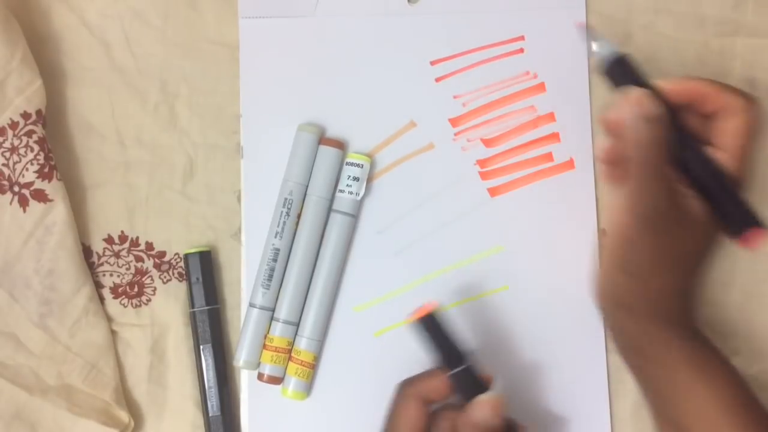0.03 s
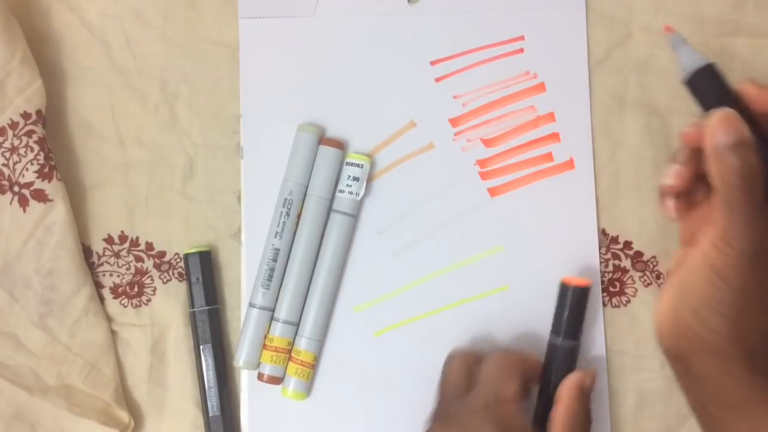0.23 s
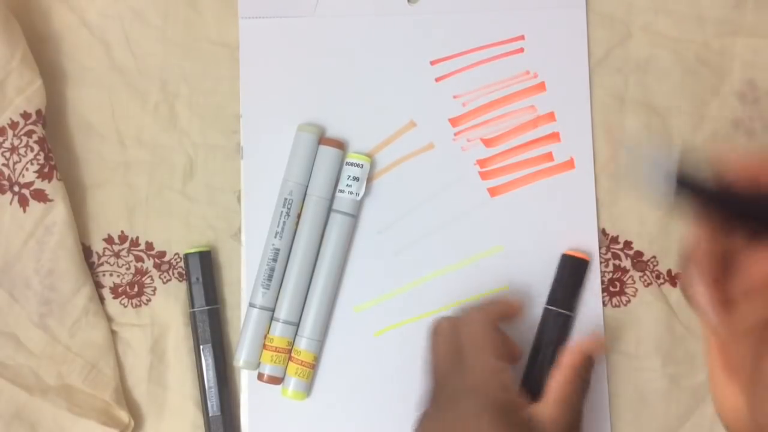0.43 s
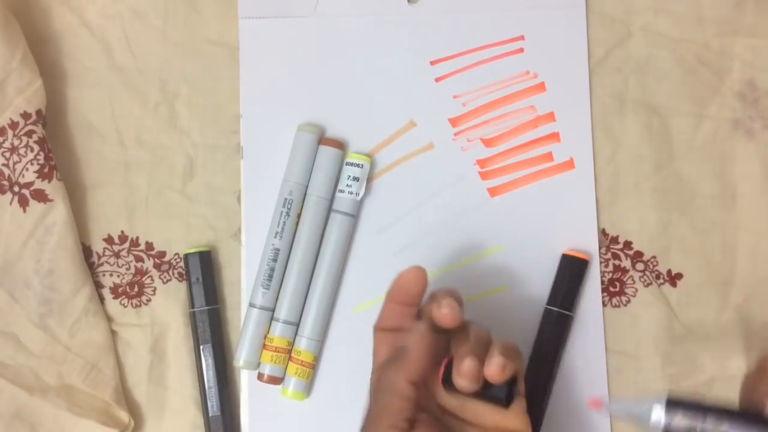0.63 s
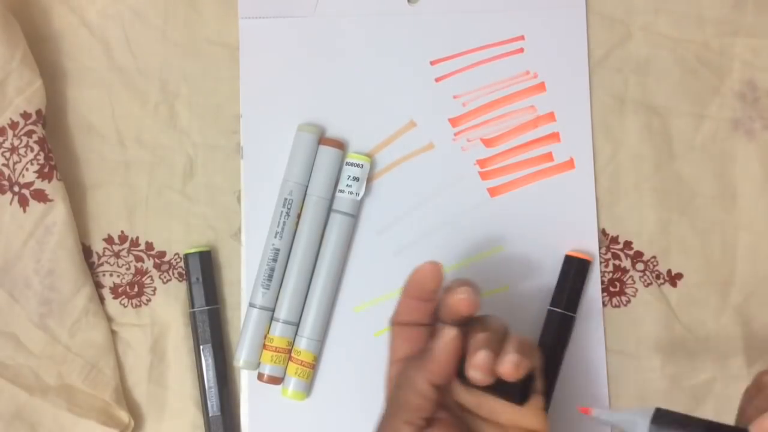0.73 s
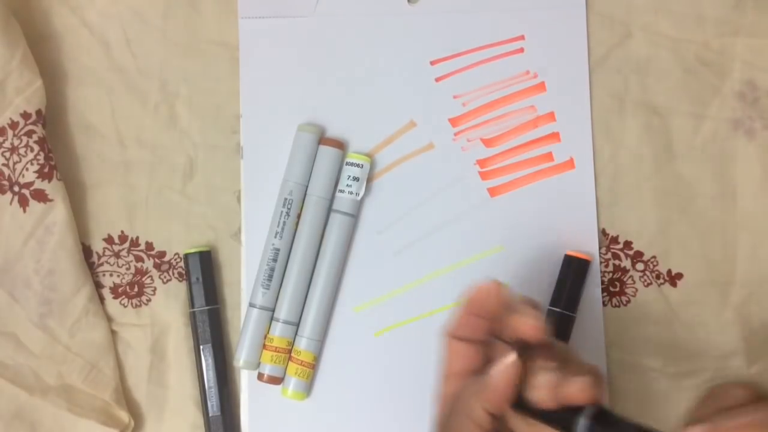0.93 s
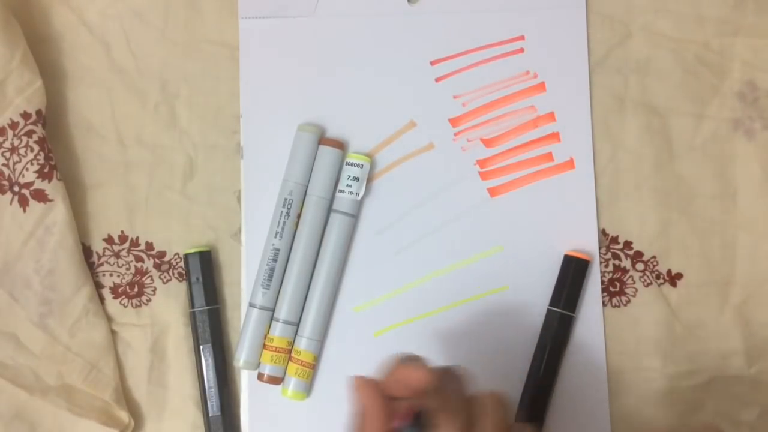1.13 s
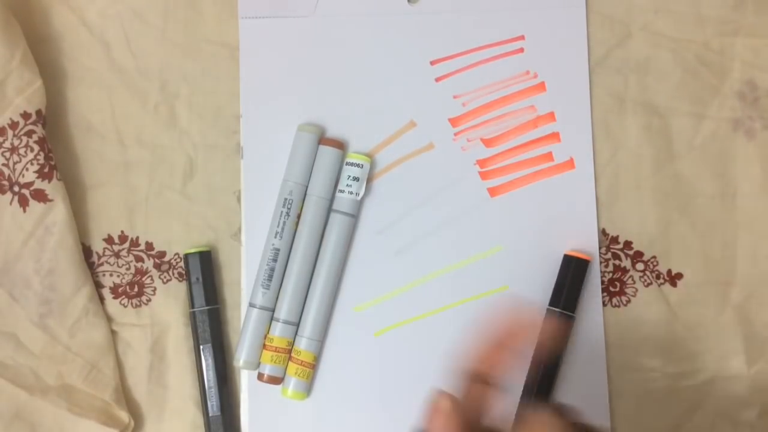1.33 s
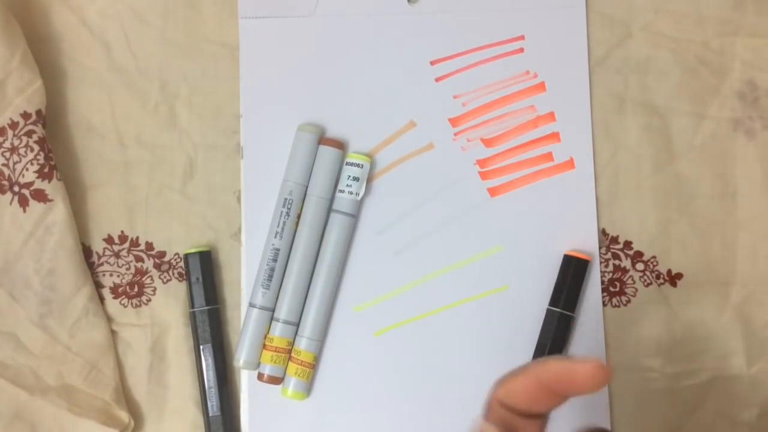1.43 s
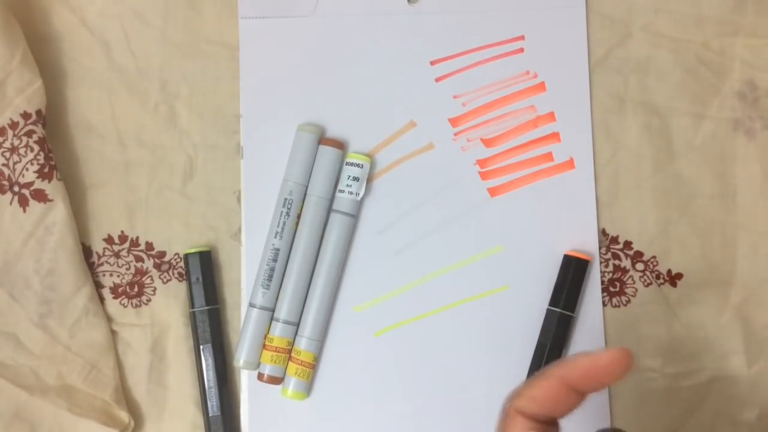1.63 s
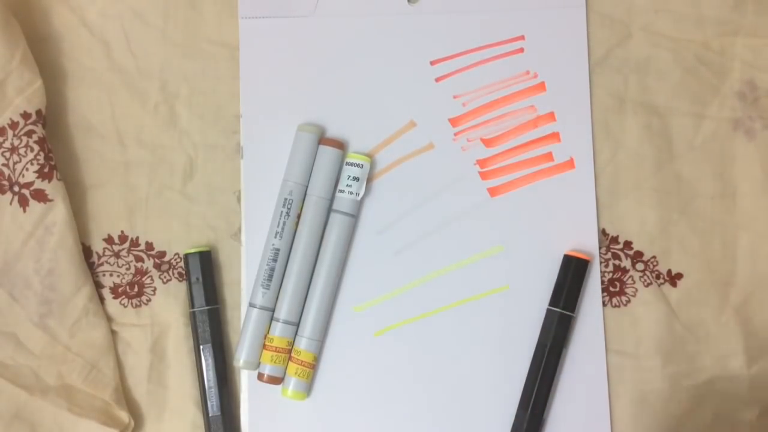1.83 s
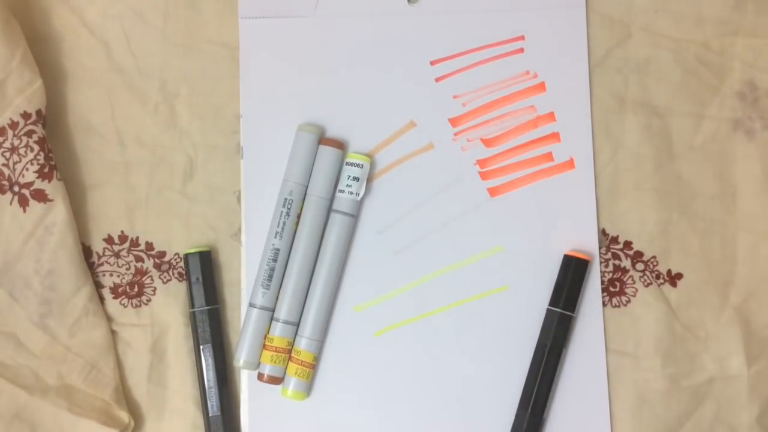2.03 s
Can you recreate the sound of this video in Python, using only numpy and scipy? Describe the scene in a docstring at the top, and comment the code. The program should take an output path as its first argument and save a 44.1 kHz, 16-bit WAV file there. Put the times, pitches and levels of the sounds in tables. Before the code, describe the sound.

Marker pens are capped, close to a phone in a small, dry, quiet room. After faint ticks, a pen lands on a papered table at 0.28 s with a dull woody knock and a softer one at 0.36. At 1.0 a cap scrapes over ridges and snaps sharply. At 1.55 another squeaks and cracks shut, clipping with a low air thump. Light ticks and soft rubbing follow until 2.1, over faint hum.

```python
"""Marker caps close beside a phone in a small, dry room: one scrapes over its ridges and snaps home, another
is pushed shut hard with a squeak, a puff of air and a crack that overloads the microphone.
Caps are coloured impulses plus damped modes; scrape and squeak are filtered noise; the puff is a pressure swing.
Earlier, a marker lands on a paper-covered table with two dull knocks: filtered thuds plus table modes.
Ticks (short cracks) and slides (grainy noise) of fingers and barrels run over room noise and a faint hum."""
import sys
import numpy as np
from scipy import signal
from scipy.fft import rfft, irfft
from scipy.io import wavfile
from scipy.ndimage import uniform_filter1d

SR = 44100
rng = np.random.default_rng(int(sys.argv[2]) if len(sys.argv) > 2 else 0)


def wav_out(sig):
    """Save sig, one row per channel (or a flat mono array), as 16-bit PCM at SR to the path in sys.argv[1]."""
    wavfile.write(sys.argv[1], SR, np.round(np.clip(np.atleast_2d(sig).T, -1, 1) * 32767).astype(np.int16))


N = 92433  # samples

# Colour and mode levels are relative within their table.
# Cap riding over its ridges and seating: start_s, click_db, ring_db
SNAP_CLICKS = [(.9925, -31, -48), (1.0000, -29, -38.5), (1.0137, -16, -18.5), (1.0221, 1.5, -38.5),
               (1.0335, 0, 1)]
# Colour of its clicks: freq_hz, level_db
SNAP_COLOUR = [(60, -41.5), (300, -26), (900, -20), (2200, -11.5), (4300, -11), (6000, -6), (7400, -0.5),
               (10300, -2.5), (11700, -19.5), (15500, -16.5)]
# Modes of its cap and barrel: freq_hz, level_db, t60_s
SNAP_MODES = [(1665, -30.5, .012), (2340, 8.5, 0.016), (2330, -3, 0.0089), (2910, 0.5, .012),
              (3200, 4.5, 0.013), (3750, 5, .011), (5520, 9, 0.0071), (8300, -13.5, .018),
              (9180, 5, 0.0141), (10500, 4, .011)]
# Smoother colour of its room return: freq_hz, level_db
SNAP_ROOM_COLOUR = [(410, -45), (700, -11), (1060, -22), (1390, -11.5), (2360, -6), (4400, -10.5),
                    (5350, -8), (6090, -13.5), (9330, -6), (11300, -19), (15500, -29)]
# Cap pushed shut hard: start_s, click_db, ring_db
SLAM_CLICKS = [(1.5475, 12.5, 2)]
# Colour of its click: freq_hz, level_db
SLAM_CLICK_COLOUR = [(150, -18.5), (500, -19), (1000, -21), (1600, -11), (2100, -6.5), (2700, 0), (3500, 3),
                     (4500, -9), (7800, -3.5), (10000, -16), (12000, -9.5), (15500, -18.5)]
# Modes of its cap and barrel: freq_hz, level_db, t60_s
SLAM_CAP_MODES = [(2690, 2, 0.013), (3434, -4.5, 0.027), (3600, -2, 0.0055), (4086, -10, 0.03),
                  (5400, -3, .014), (6650, -11, .014), (8130, -2.5, 0.029), (8620, -23, .02)]
# Smoother colour of its room return: freq_hz, level_db
SLAM_ROOM_COLOUR = [(470, -46.5), (800, -17), (1040, -21.5), (1150, -9), (1350, -12.5), (1760, -15),
                    (2710, -2), (4880, -7), (7970, -8.5), (14000, -21.5)]
# Cap scraping between its ridges: time_s, level_db
SCRAPE_LEVELS = [(1.006, -50), (1.012, -42), (1.020, -35.5), (1.025, -30), (1.033, -30.5)]
# Squeak of the tight cap: freq_hz, width_octaves, level_db
SQUEAK_TONES = [(3449, 0.076, -34), (4200, 0.027, -45.5), (7760, 0.02, -29.5)]
# Marker laid on the table: start_s, level_db, hardness_cutoff_hz
TABLE_KNOCKS = [(0.275, -9.5, 8500), (0.3557, -19.5, 1220)]
# Table modes: freq_hz, level_db, t60_s
TABLE_MODES = [(91, -14.5, .13), (165.4, -5.5, 0.11), (277, -22, 0.09), (405, -11.5, 0.097),
               (447, -5, 0.036), (482.3, -14, 0.17), (640, -43, 0.025), (727, 0, 0.043),
               (883, -14.5, 0.043), (978, -19, 0.08), (1454, -8.5, 0.058), (1530, -20, 0.081),
               (2200, -40, 0.02)]
# Colour of the contact thud: freq_hz, level_db
THUD_COLOUR = [(40, 6), (130, 6), (400, 10), (850, -0.5), (1200, -6.5), (2400, -16), (4500, -45),
               (15000, -54)]
# Knocks thrown back by near walls: delay_s, level_db
WALL_ECHOES = [(.0072, -7.5), (0.0122, -2.5)]
# Light touches of plastic: start_s, level_db, centre_hz, width_octaves
PLASTIC_TICKS = [(.024, -42, 4000, 6), (.058, -93, 9000, 1), (.078, -38.5, 11000, 4),
                 (0.2749, -25.5, 6250, 0.3), (0.2768, -28.5, 2530, 1.7), (0.3659, -30, 2200, 0.7),
                 (.434, -34.5, 4500, 2), (1.141, -34, 2380, 1.8), (1.151, -51, 5000, 1.9),
                 (1.4914, -29, 8130, 1.65), (1.5243, -31, 3400, 1.2), (1.5358, -42, 11000, 2),
                 (1.6976, -36, 2770, 0.72), (1.7013, -38.5, 6500, 0.63), (1.889, -45, 7000, 0.75),
                 (1.9021, -29, 5500, 0.93), (2.043, -41, 6500, 1.2)]
# Colour of a finger's soft nudge: freq_hz, level_db
NUDGE_COLOUR = [(100, -34), (200, -14), (290, 0.5), (420, -2.5), (560, -8), (900, -29.5)]
# Skin and plastic sliding: start_s, length_s, level_db, centre_hz, width_octaves
SLIDES = [(.01, 0.11, -57.5, 8950, 7.5), (0.112, 0.17, -64, 1670, 2.2), (0.368, .125, -58.5, 2600, 2.4),
          (0.463, 0.026, -50, 1800, 1.14), (0.491, .2, -66, 1370, 2.8), (1.134, .03, -51.5, 4850, 2),
          (1.162, 0.088, -50, 11500, .8), (1.173, 0.095, -60.5, 3080, 3.1), (1.25, 0.24, -62.5, 6000, 1.6),
          (1.687, .075, -51, 6000, 1.7), (1.759, .075, -55.5, 8000, 1.5), (1.887, 0.031, -56, 4914, 2),
          (1.925, .075, -55.5, 8500, 1.6), (2.0, .08, -64, 6500, 1.6)]
# Colour of the room noise: freq_hz, level_db
FLOOR_COLOUR = [(15, -50), (25, -23.5), (59, -9.5), (91, -10), (122, -0.5), (147, -15.5), (178, -11),
                (239, -13.5), (469, -17), (581, -19.5), (1140, -30), (1660, -25.5), (2550, -32),
                (8560, -30.5), (15500, -38.5)]

SNAP_T60_S, SNAP_ROOM_DB = 0.0045, -11.5
SLAM_T60_S, SLAM_ROOM_DB = 0.0037, -11.5
CAP_GRIT_GAIN = 0.2
SCRAPE_HZ, SCRAPE_OCTAVES, SCRAPE_GRAIN_DB = 7700, 0.6, 4
SQUEAK_S = 0.018
PUFF_S, PUFF_DB, PUFF_LOW_HZ = 1.5478, -4, 42.3
PUFF_RISE_S, PUFF_FALL_S, PUFF_TURN_S = 0.0019, 0.0088, 0.0005
THUD_DB, TABLE_DB, KNOCK_ROOM_DB, KNOCK_LOW_HZ = -2.5, -3.5, -8, 57
TICK_T60_S, TICK_ROOM_DB = 0.004, -10
NUDGE_S, NUDGE_DB = 1.9027, -29
RUB_ATTACK_SHARE, RUB_RELEASE_SHARE = 0.17, 0.29  # of each slide's length
RUB_GRAIN_DB, RUB_ROOM_DB = 1.5, -6
FLOOR_DB = -59
HUM_HZ, HUM_DB, HUM_WAVER_DB = 119.5, -67.5, 1.8
ROOM_T60_S, ROOM_DELAY_S, ROOM_BUILD_S, ROOM_LOW_HZ = 0.16, 0.001, 0.003, 486
WALL_S, WALL_SPREAD_S, WALL_GAIN = 0.021, 0.006, 0.3
TOP_HZ = 15800


def undb(db):
    """Decibels to gain."""
    return 10 ** (np.asarray(db) / 20)


def unit(x):
    """Scale to rms 1."""
    return x / np.sqrt(np.mean(x ** 2))


def add(out, start_s, x):
    """Mix x into out from a start time."""
    i = int(start_s * SR)
    out[i:i + len(x)] += x[:N - i]


def fade(t60_s):
    """Exponential decay, 60 dB in t60_s."""
    return undb(-60 * np.arange(N // 6) / SR / t60_s)


def walk(rate_hz, size=N):
    """Random wander: straight lines between normal draws at rate_hz."""
    return np.interp(np.arange(size) * rate_hz / SR, np.arange(size), rng.standard_normal(size))


def lowpass(x, hz):
    """Second-order low-pass."""
    return signal.sosfilt(signal.butter(2, hz, fs=SR, output="sos"), x)


def highpass(x, hz):
    """Second-order high-pass."""
    return signal.sosfilt(signal.butter(2, hz, "high", fs=SR, output="sos"), x)


def colour(x, points):
    """Minimum-phase filter through (freq_hz, level_db) points."""
    hz, db = np.array(points).T
    grid_hz = np.maximum(np.fft.rfftfreq(4096, 1 / SR), 1)
    gain = undb(np.interp(np.log(grid_hz), np.log(hz), db))
    # folding the cepstrum makes the filter causal
    cepstrum = irfft(np.log(gain))
    half = len(cepstrum) // 2
    cepstrum[1:half] *= 2
    cepstrum[half + 1:] = 0
    response = irfft(np.exp(rfft(cepstrum)))
    return signal.fftconvolve(x, response)[:len(x)]


def hump(centre_hz, width_octaves):
    """Colour points of a broad resonance, 9.5 dB down at width_octaves either side."""
    hz = np.geomspace(20, SR / 2, num=200)
    offset = np.log2(hz / centre_hz) / width_octaves
    return np.c_[hz, -20 * np.log10(1 + 2 * offset ** 2)]


def ring(modes):
    """Damped modes after a blow, peak 1."""
    t = np.arange(N // 6) / SR
    y = np.zeros(len(t))
    for k, (hz, db, t60_s) in enumerate(modes):
        phase = k * k * np.pi / 2
        y += undb(db) * fade(t60_s) * np.sin(2 * np.pi * hz * t + phase)
    return y / np.abs(y).max()


def crack(t60_s, points, grit):
    """Sharp contact of fixed energy: an impulse with a decaying noise fringe, coloured."""
    x = grit * rng.standard_normal(N // 6) * fade(t60_s)
    x[0] += 1
    y = colour(x, points)
    return 2.79 * y / np.linalg.norm(y)


def reverb(x):
    """Short diffuse room tail, strengthened by a cluster of wall reflections."""
    t = np.arange(N // 6) / SR
    walls = 1 + WALL_GAIN * np.exp(-0.5 * ((t - WALL_S) / WALL_SPREAD_S) ** 2)
    build = np.clip((t - ROOM_DELAY_S) / ROOM_BUILD_S, 0, 1)
    tail = rng.standard_normal(len(t)) * walls * fade(ROOM_T60_S) * build
    return signal.fftconvolve(x, tail / np.linalg.norm(tail))[:N]


def room(x, wet_db, low_hz):
    """Direct sound plus the room, thin below low_hz."""
    return x + undb(wet_db) * highpass(reverb(x), low_hz)


def cap(clicks, points, modes, t60_s, room_points, wet_db):
    """Each click cracks, rings the hollow plastic, radiates all round and fills the room."""
    direct, spread = np.zeros(N), np.zeros(N)
    for start_s, click_db, ring_db in clicks:
        click = undb(click_db) * crack(t60_s, points, grit=CAP_GRIT_GAIN)
        add(direct, start_s, click + undb(ring_db) * ring(modes))
        add(spread, start_s, undb(click_db) * crack(t60_s, room_points, grit=0))
    return direct + undb(wet_db) * reverb(spread)


def puff():
    """Pressure piles up ahead of the closing hand and turns to suction when the cap stops."""
    t = np.arange(N) / SR - PUFF_S
    envelope = np.exp(np.minimum(t / PUFF_RISE_S, -t / PUFF_FALL_S))
    pressure = -np.tanh(t / PUFF_TURN_S) * envelope
    sos = signal.butter(3, PUFF_LOW_HZ, "high", fs=SR, output="sos")
    return undb(PUFF_DB) * signal.sosfiltfilt(sos, pressure)


def squeak():
    """Narrow resonances swell while the tight cap slides and stop when it seats."""
    out = np.zeros(N)
    swell = np.linspace(0, 1, int(SQUEAK_S * SR))
    for hz, octaves, db in SQUEAK_TONES:
        b, a = signal.iirpeak(hz, 1 / (octaves * np.log(2)), fs=SR)
        tone = signal.lfilter(b, a, rng.standard_normal(N // 6))
        add(out, SLAM_CLICKS[0][0] - SQUEAK_S, undb(db) * swell * unit(tone[-len(swell):]))
    return out


def scrape():
    """Bright stick-slip friction that grows as the cap nears its seat."""
    times_s, db = np.array(SCRAPE_LEVELS).T
    level = undb(np.interp(np.arange(N) / SR, times_s, db, left=-np.inf, right=-np.inf))
    slips = rng.standard_normal(N) * undb(SCRAPE_GRAIN_DB * walk(690))
    return level * unit(colour(slips, hump(SCRAPE_HZ, SCRAPE_OCTAVES)))


def knocks():
    """The two ends of a marker land on the table; the thud returns from near walls."""
    thud = colour(signal.unit_impulse(N // 6), THUD_COLOUR)
    thud = undb(THUD_DB) * thud / np.abs(thud).max()
    # the board answers 20 samples late, its onset rounded over 12
    late_ring = np.r_[np.zeros(20), ring(TABLE_MODES)]
    board = undb(TABLE_DB) * uniform_filter1d(late_ring, size=12)[:len(thud)]
    echo = lowpass(thud, 1200)
    out = np.zeros(N)
    for start_s, db, hard_hz in TABLE_KNOCKS:
        add(out, start_s, undb(db) * lowpass(thud + board, hard_hz))
        for delay_s, echo_db in WALL_ECHOES:
            add(out, start_s + delay_s, undb(db + echo_db) * echo)
    return room(highpass(out, KNOCK_LOW_HZ), KNOCK_ROOM_DB, low_hz=60)


def touches():
    """Small contacts of barrels and fingernails crack briefly; one soft nudge is duller."""
    out = np.zeros(N)
    for start_s, db, hz, octaves in PLASTIC_TICKS:
        add(out, start_s, undb(db) * crack(TICK_T60_S, hump(hz, octaves), grit=0.2))
    add(out, NUDGE_S, undb(NUDGE_DB) * crack(TICK_T60_S, NUDGE_COLOUR, grit=0))
    return room(out, TICK_ROOM_DB, ROOM_LOW_HZ)


def rubs():
    """Grainy friction that swells and dies with each slide."""
    out = np.zeros(N)
    for start_s, length_s, db, hz, octaves in SLIDES:
        roughness = undb(RUB_GRAIN_DB * walk(400, size=N // 4))
        grains = rng.standard_normal(N // 4) * roughness
        hiss = unit(colour(grains, hump(hz, octaves)))[:int(length_s * SR)]
        share = np.linspace(0, 1, len(hiss))
        ramps = np.minimum(share / RUB_ATTACK_SHARE, (1 - share) / RUB_RELEASE_SHARE)
        add(out, start_s, undb(db) * hiss * np.minimum(1, ramps))
    return room(out, RUB_ROOM_DB, ROOM_LOW_HZ)


def background():
    """Room air as coloured noise, and a hum wavering in pitch and level."""
    hum_hz = HUM_HZ * (1 + 0.01 * walk(16))
    hum = np.sin(2 * np.pi * np.cumsum(hum_hz) / SR) * undb(HUM_WAVER_DB * walk(3.3))
    air = colour(rng.standard_normal(N), FLOOR_COLOUR)
    return undb(FLOOR_DB) * unit(air) + undb(HUM_DB) * unit(hum)


def scene():
    """All sources at the one microphone."""
    slam = cap(SLAM_CLICKS, SLAM_CLICK_COLOUR, SLAM_CAP_MODES, SLAM_T60_S, SLAM_ROOM_COLOUR, SLAM_ROOM_DB)
    snap = cap(SNAP_CLICKS, SNAP_COLOUR, SNAP_MODES, SNAP_T60_S, SNAP_ROOM_COLOUR, SNAP_ROOM_DB)
    caps = slam + puff() + squeak() + snap + scrape()
    handling = knocks() + touches() + rubs()
    return (caps + handling + background())[None]


def record(dry):
    """The phone clips the loudest peaks, then cuts the top."""
    clipped = np.clip(dry, -1, 1)
    return signal.sosfilt(signal.ellip(10, 0.1, 70, TOP_HZ, fs=SR, output="sos"), clipped)


dry = scene()
out = record(dry)
wav_out(out)
```